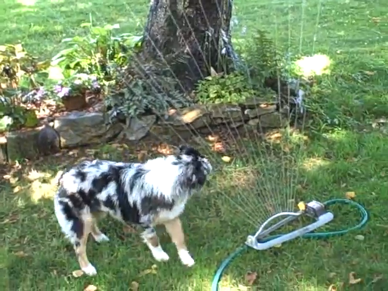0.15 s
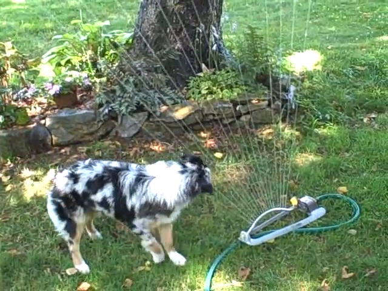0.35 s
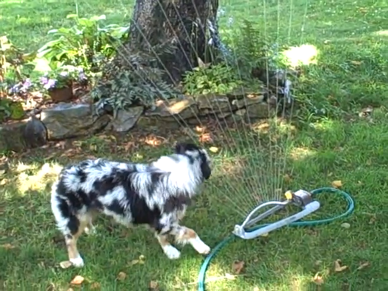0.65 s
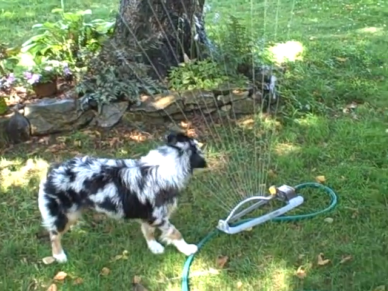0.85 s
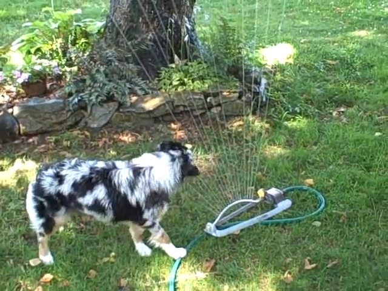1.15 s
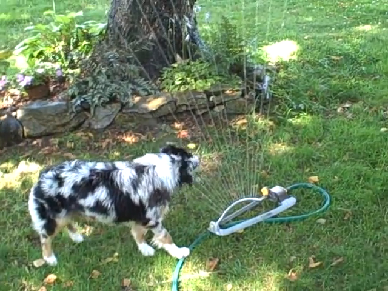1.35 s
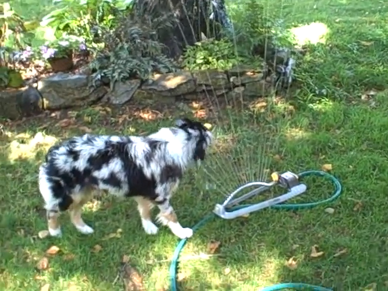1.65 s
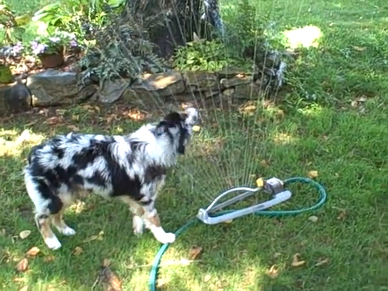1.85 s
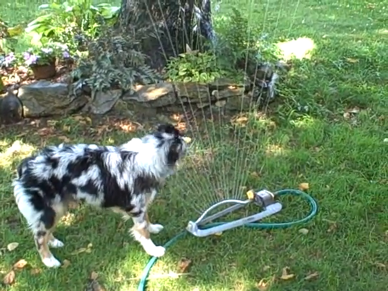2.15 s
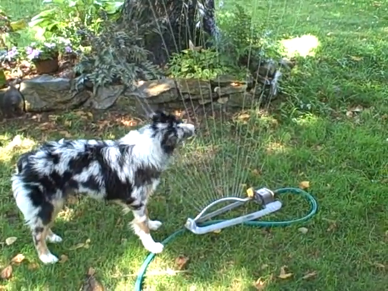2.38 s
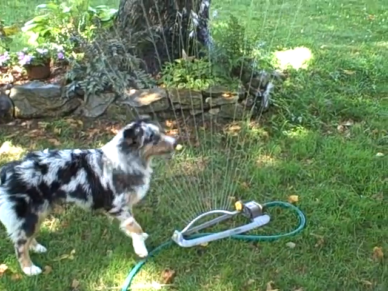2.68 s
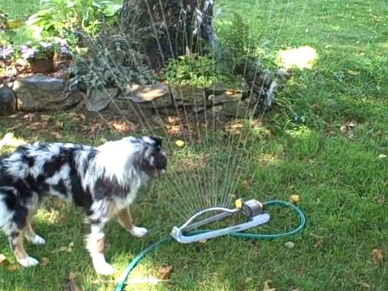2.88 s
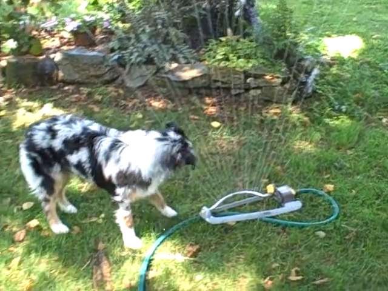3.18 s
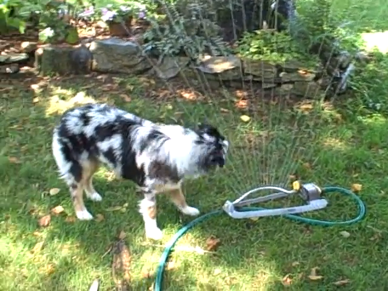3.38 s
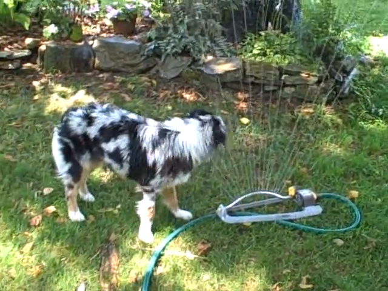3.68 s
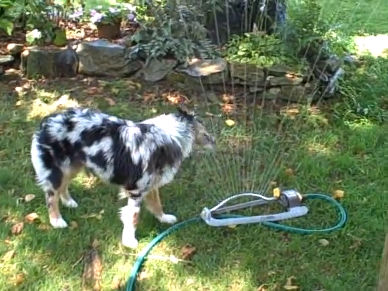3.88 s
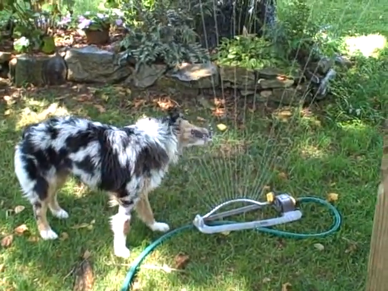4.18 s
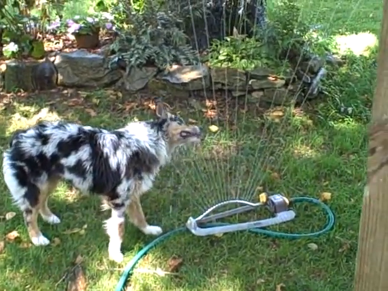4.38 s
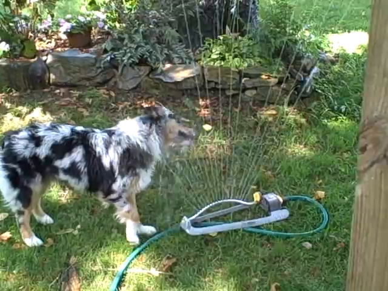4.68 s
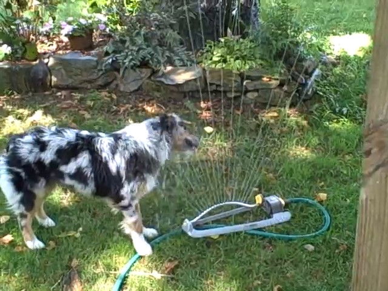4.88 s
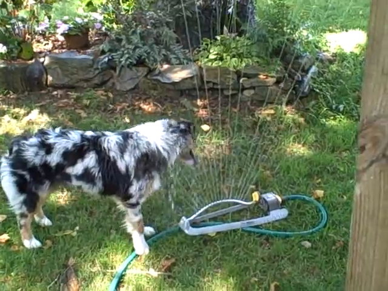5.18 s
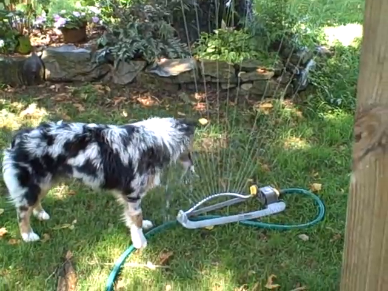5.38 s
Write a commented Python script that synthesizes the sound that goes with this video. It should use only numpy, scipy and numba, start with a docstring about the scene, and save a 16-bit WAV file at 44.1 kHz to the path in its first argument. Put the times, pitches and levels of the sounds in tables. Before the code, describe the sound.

Water sprays a dog outdoors in irregular bursts, crisp and hissy, over steady patter on grass and faint low rumble. Little mouth gulps and soft paw thuds come early; a lull holds a few dry ticks and a thin insect buzz. From about three and a half seconds the splashing builds, with squirts and bubbling, vowel-like water sounds in the open mouth. One microphone, no obvious echo.

```python
"""Dog snapping at a lawn sprinkler

Jets patter on a dog: random impacts over a mist of tiny ones, coloured as spatter and splash on its muzzle
and as hiss on its coat, ring in its open mouth through resonances that follow the jaw. Big drops snap as brief
sines, and small lip pockets squirt. A shrill buzz, probably an insect, is a click train ringing three resonances.
Paws thud and dry ticks crack in shaped noise, over patter on grass, a faint outdoor rumble and a drone."""
import sys
import numpy as np
from scipy import signal
from scipy.fft import rfft, irfft, next_fast_len
from scipy.io import wavfile
from scipy.ndimage import uniform_filter1d, map_coordinates
from numba import njit

SR = 44100
rng = np.random.default_rng(int(sys.argv[2]) if len(sys.argv) > 2 else 0)


def digitize_waveform(pressure):
    """Quantize a signal to 16-bit integers and store it at the path in sys.argv[1].

    Rows of a 2-D input are taken as channels; values are limited to [-1, 1].
    """
    field = np.atleast_2d(pressure).T
    bounded = np.clip(field, -1, 1)
    quanta = np.round(bounded * 32767).astype(np.int16)
    wavfile.write(sys.argv[1], SR, quanta)


N = 244314

# "Relative" levels are set before the layer's own trim.
# Dog's muzzle pushed into the jets:
# (start [s], length [s], relative spatter level [dB], relative splash level round the lips [dB])
SNAPS = [(0.01, 0.12, -51.5, -75), (0.612, 0.083, -40, -64), (0.728, 0.14, -43.5, -59),
         (0.926, 0.12, -48.5, -71), (1.187, 0.03, -39, -55), (1.295, 0.07, -39, -54.5),
         (1.439, 0.33, -38, -53), (1.712, 0.039, -42.5, -56), (2.146, .16, -41.5, -53.5),
         (2.24, .07, -43, -56), (2.362, 0.333, -49, -57), (3.52, 0.27, -42, -53.5),
         (3.652, 0.097, -41, -52), (3.902, .11, -39, -48.5), (4.07, 0.5, -41.5, -48),
         (4.17, 0.41, -36, -52.5), (4.596, 0.54, -38, -49.5), (4.68, 0.018, -33.5, -57),
         (4.898, 0.04, -39, -48), (5.024, .15, -41.5, -47), (5.225, 0.28, -41.5, -49)]
# Fan of jets sweeping over the coat: (start [s], length [s], relative level [dB])
COAT_SWEEPS = [(-.05, 0.4, -55.5), (.42, 0.25, -54), (.6, 0.59, -52), (1.16, .68, -55), (1.85, 0.82, -55.5),
               (2.68, 0.15, -56.5), (3.14, 0.37, -56.5), (3.5, 0.27, -51), (3.82, 0.49, -53.5),
               (4.2, 0.49, -46), (4.87, 0.097, -45), (5.01, 0.29, -40.5), (5.33, .25, -46.5)]
# Single gulps of water: (time of widest gape [s], half length [s], relative level [dB],
# cavity pitch at widest gape [Hz])
GULPS = [(.085, .013, -54.5, 1220), (0.626, 0.013, -59, 1320), (.66, .018, -54, 930),
         (.797, 0.023, -52.5, 896), (0.952, 0.033, -62.5, 940), (1.307, 0.0091, -50, 1625),
         (1.359, 0.029, -56, 1110), (1.487, .022, -53.5, 1030), (1.57, 0.025, -52.5, 920),
         (1.685, 0.019, -52.5, 1000), (1.77, 0.047, -54, 980), (2.199, 0.018, -56, 960),
         (2.26, 0.043, -58, 800), (2.475, 0.029, -59.5, 1020), (2.698, 0.017, -52, 1600),
         (3.756, 0.048, -59.5, 1200), (3.953, 0.027, -50.5, 1740), (4.26, 0.023, -43, 1276)]
# One long drink with the jaw working: (time [s], cavity pitch [Hz], relative level [dB])
DRINK = [(4.35, 1400, -58), (4.382, 1320, -45.5), (4.412, 1220, -50), (4.558, 1030, -42),
         (4.578, 1120, -44), (4.604, 1510, -47.5), (4.694, 1800, -45.5), (4.754, 1190, -56),
         (4.76, 1210, -44), (4.776, 1230, -47.5), (4.87, 1600, -50), (4.948, 1130, -42.5),
         (5.018, 1550, -54.5), (5.056, 1450, -46.5), (5.148, 1630, -50.5), (5.178, 1430, -52.5),
         (5.304, 1670, -46), (5.54, 1840, -60)]
# Wet squirts caught in a fold of the lips: (time of peak [s], level [dB], pitch [Hz])
SQUIRTS = [(.933, -50, 3930), (1.55, -53, 1960), (1.765, -45.5, 2700), (2.58, -51, 2410), (2.69, -49, 2550),
           (3.66, -45, 4480), (3.69, -40, 7400), (3.964, -48, 2430), (4.02, -41.5, 5040), (4.15, -43, 5200),
           (4.23, -40, 8000)]
# Single heavy drops: (time, just ahead of the snap [s], level [dB], pitch [Hz])
DROPS = [(0.4696, -30, 11800), (0.5148, -28, 10700), (0.593, -25, 13200), (0.8783, -20, 14000),
         (1.0319, -22, 14300), (1.2092, -24, 12200), (1.461, -20, 13400), (1.468, -21, 9250),
         (1.7386, -17.5, 10200), (2.066, -26, 11170), (2.2936, -21.5, 11700), (3.5667, -26, 11200),
         (3.7462, -17.5, 8500), (4.5228, -12, 13700), (4.5404, -19, 12300), (4.567, -18, 9150)]
# Swells of the insect's buzz:
# (start [s], length [s], relative level [dB], main resonance [Hz], mean click rate [1/s])
BUZZ = [(-.15, .48, -51.5, 7360, 90), (0.719, 0.37, -52.5, 5500, 168), (1.84, 0.42, -50, 5520, 168),
        (3.061, 0.444, -48.5, 5460, 185)]
# Paws on the turf: (time, just ahead of the thud's peak [s], relative level [dB])
PAWS = [(.085, -56.5), (.79, -55.5), (1.018, -60), (1.378, -57), (1.625, -60), (1.775, -57), (2.319, -58.5),
        (2.49, -61), (2.745, -67), (3.669, -60)]
# Dry ticks in the grass underfoot: (time [s], relative level [dB])
TICKS = [(0.456, -38), (2.903, -48), (2.916, -44), (2.953, -33.5), (2.976, -40)]
# Colour of fine bright spatter: (frequency [Hz], relative level [dB])
SPATTER = [(300, -32), (2000, -26), (3200, -11.5), (4200, -9), (6500, -4), (8500, -1), (10500, 1),
           (12500, 1.5), (14500, 0.5), (15800, 0.5)]
# Colour of the duller splash round the lips: (frequency [Hz], relative level [dB])
SPLASH = [(80, -11), (250, -11.5), (600, -10.5), (1200, -5), (1800, -1.5), (2300, 0), (3200, 0),
          (4500, 0.5), (7000, -1.5), (10000, 0.5), (15000, -32)]
# Colour of water striking fur: (frequency [Hz], relative level [dB])
FUR = [(500, -30), (2000, -11), (3100, -13), (4200, -2), (5400, -1), (6400, -2), (7700, -4), (9000, -13),
       (11000, -8), (15000, -29)]
# Colour of drops on grass: (frequency [Hz], relative level [dB])
GRASS = [(200, -5.5), (700, -3), (1500, -2), (2500, 4.5), (3800, 4.5), (6000, 0), (8000, 5), (10000, -27),
         (15000, -18.5)]
# Colour of the outdoor rumble: (frequency [Hz], relative level [dB])
RUMBLE = [(15, -16), (30, -1.5), (55, 1.5), (100, -3), (200, -4.5), (400, -7.5), (800, -10.5), (2000, -16),
          (8000, -41)]

# Rise [s], fall [s] and growth over the held length [dB] of each kind of swell
SNAP_ATTACK_S, SNAP_RELEASE_S, SNAP_PUSH_DB = 0.017, 0.059, 3  # grows as the muzzle goes deeper
COAT_ATTACK_S, COAT_RELEASE_S, COAT_GROWTH_DB = 0.035, 0.061, -0.5
BUZZ_ATTACK_S, BUZZ_RELEASE_S, BUZZ_GROWTH_DB = 0.18, 0.023, 3
STRAY_SPATTER_DB, STRAY_SPLASH_DB = -54.5, -65  # steady stray beads, relative levels
DRIP_DB, DRIP_S = -9.5, 0.18  # run-off from the muzzle: level under the snap, decay time
OPENING_BEND, CLOSING_BEND = 0.1, 0.028  # share the pitch is raised half a length from widest gape
OPENING_SLOWER = 1.24  # the jaw opens this many times more slowly than it shuts
DRINK_DB, DRINK_FADE_S = 0.5, 0.02  # trim of the long drink, fade-in time
UPPER_HZ, MIDDLE_GAPE_HZ = 2220, 1290  # upper and main mouth resonances at a middling gape
UPPER_FOLLOWS = 0.17  # exponent: how far the upper resonance follows the main pitch
BETWEEN_CLICKS = 0.15  # scratch left between clicks, as a share of the click's onset
TOP_HZ = 15780  # band limit of the whole scene


def muzzle():
    """Jets break on the muzzle in uneven spurts, as bright spatter and duller splash, then water runs off."""
    spatter = coloured(patchy(droplets(rate=5500, scatter_db=4, mist_db=-5), depth_db=2), SPATTER)
    splash = coloured(patchy(droplets(rate=3500, scatter_db=3, mist_db=-5), depth_db=2), SPLASH)
    start, length, spatter_db, splash_db = np.transpose(SNAPS)

    def flow(db, stray_db):
        """Direct hit, run-off and stray beads add in power."""
        hit = swells(zip(start, length, db), SNAP_ATTACK_S, SNAP_RELEASE_S, SNAP_PUSH_DB)
        run_off = swells(zip(start, length, db + DRIP_DB), SNAP_ATTACK_S, DRIP_S, SNAP_PUSH_DB)
        return np.sqrt(hit ** 2 + run_off ** 2 + amp(stray_db) ** 2)

    spatter *= amp(1.5) * flow(spatter_db, STRAY_SPATTER_DB) * spurting(rate=130, steady=2.8)
    splash *= amp(5) * flow(splash_db, STRAY_SPLASH_DB) * spurting(rate=90, steady=3.9)
    return spatter + splash


def coat():
    """On fur the jets hiss softly, fluttering as they break into beads, and a fine spray bounces off."""
    fur = coloured(patchy(droplets(rate=4000, scatter_db=6.5, mist_db=-3), depth_db=1.5), FUR)
    bounce = coloured(droplets(rate=2100, scatter_db=11, mist_db=-6), SPATTER)
    flutter = amp(0.98 * wobble(150))
    hiss = unit((fur + amp(-0.5) * bounce) * flutter)
    gain = swells(COAT_SWEEPS, COAT_ATTACK_S, COAT_RELEASE_S, COAT_GROWTH_DB)
    return amp(3.5) * gain * hiss


def mouth():
    """Drops drum in a cavity whose pitch follows the jaw; a weaker resonance above it moves less."""
    hz, gain = jaw()
    upper_hz = UPPER_HZ * (hz / MIDDLE_GAPE_HZ) ** UPPER_FOLLOWS
    hz = hz * (1 + 0.022 * wobble(70))  # sloshing water keeps changing the hollow
    drumming = droplets(rate=2200, scatter_db=1, mist_db=-1) * spurting(rate=100, steady=2.6)
    cavity = hollow(hollow(drumming, hz, width_hz=120), hz, width_hz=900)
    upper = hollow(hollow(drumming, upper_hz, width_hz=210), upper_hz, width_hz=650)
    return amp(-1) * gain * (cavity + amp(-6) * upper)


def jaw():
    """Pitch and gain of the mouth: each gulp sinks and rings loudest at the gape; the long drink wanders."""
    t = np.arange(N) / SR
    drink_hz, drink_db = curves(DRINK)
    drink_fade = np.clip((t - DRINK[0][0]) / DRINK_FADE_S + 0.5, 1e-6, 1)
    gains = [amp(drink_db + DRINK_DB) * drink_fade]
    pitches = [drink_hz]
    for s, half_length, db, hz in GULPS:
        stretch = np.where(t < s, OPENING_SLOWER, 1)
        u = (t - s) / (half_length * stretch)  # zero at the widest gape
        bend = np.where(u < 0, OPENING_BEND, CLOSING_BEND)
        gains.append(amp(db) * np.exp(-u ** 2 / 2))
        pitches.append(hz * (1 + bend * np.minimum(u ** 2, 4)))
    power = np.square(gains)
    # the loudest gesture dominates the pitch
    return np.average(pitches, axis=0, weights=power), np.sqrt(power.sum(axis=0))


def squirts():
    """A jet briefly rings a small pocket between lip and teeth."""
    out, t = np.zeros(N), np.arange(N) / SR
    beads = droplets(rate=7800, scatter_db=-20, mist_db=8)
    for s, db, hz in SQUIRTS:
        burst = np.exp(-((t - s) / 0.011) ** 2)
        pocket = hollow(hollow(beads, hz, width_hz=0.091 * hz), hz, width_hz=0.66 * hz)
        out += amp(db) * burst * pocket
    return out


def heavy_drops():
    """Each big drop snaps as a fast-decaying sine, then scatters a short bright spray."""
    out, t = np.zeros(N + SR), np.arange(SR // 25) / SR
    fizz = coloured(rng.standard_normal(N), [(1000, -38), (4000, -7), (9000, -3.5), (15000, -1.5)])
    for s, db, hz in DROPS:
        start = round((s + 0.0012) * SR)
        # each -60 * t / T term falls 60 dB in T seconds
        snap = np.sin(2 * np.pi * hz * t) * amp(-60 * t / 0.0032)
        spray_fade = 0.1 * amp(-60 * t / 0.0089) + amp(-16 - 60 * t / 0.066)
        spray = fizz[start:][:len(t)] * spray_fade
        out[start:][:len(t)] += amp(db) * (snap + spray)
    return out[:N]


def insect():
    """A fast train of scratchy clicks rings a shrill main resonance and two weaker ones."""
    events = [(s, length, db) for s, length, db, _, _ in BUZZ]
    gain = swells(events, BUZZ_ATTACK_S, BUZZ_RELEASE_S, BUZZ_GROWTH_DB)
    edges = [(edge, pitch, per_s) for s, length, _, pitch, per_s in BUZZ for edge in (s, s + length)]
    hz, rate = curves(edges)
    cycle = np.cumsum(rate * (1 + 0.077 * wobble(60)) / SR) % 1  # share of the click period gone by
    click_shape = np.exp(-np.pi * cycle) + BETWEEN_CLICKS
    clicks = click_shape * amp(wobble(120)) * rng.standard_normal(N)
    shrill = hollow(hollow(clicks, hz, width_hz=600), hz, width_hz=1000)
    low = hollow(hollow(clicks, 4130, width_hz=970), 3730, width_hz=1200)
    high = hollow(hollow(clicks, 7330, width_hz=590), 8300, width_hz=1300)
    return gain * unit(shrill + amp(-4) * low + amp(-3.5) * high)


def paws():
    """Feet shifting on turf give soft low thuds: dark noise under smooth bumps of weight."""
    t = np.arange(N) / SR
    weight = sum(amp(db) * np.exp(-((t - s - 0.015) / 0.012) ** 2) for s, db in PAWS)
    thud_colour = [(30, -34), (90, -1.5), (150, 0), (300, -7), (900, -47), (3000, -80)]
    return amp(2) * weight * coloured(rng.standard_normal(N), thud_colour)


def ticks():
    """Something dry clicks in the grass: a broad crack, then a faint rustle."""
    t = np.arange(N) / SR

    def fade(age):
        """A crack falling 60 dB in 10 ms and a weaker rustle taking 73 ms."""
        crack = amp(-60 * np.abs(age) / 0.01)
        rustle = amp(-28 - 60 * np.abs(age) / 0.073)
        return (age >= 0) * (crack + rustle)

    force = sum(amp(db) * fade(t - s) for s, db in TICKS)
    dry_colour = [(300, -14.5), (1200, -9), (2200, -7), (4000, 4), (8000, 3), (15000, -17)]
    return amp(-5) * force * coloured(rng.standard_normal(N), dry_colour)


def garden():
    """Far drops fall steadily on grass, over a low rumble and a faint distant drone near 58 Hz."""
    grass = coloured(droplets(rate=1800, scatter_db=2.5, mist_db=-1.5), GRASS)
    patter = grass * amp(-57.5 + 0.35 * wobble(7.6))
    rumble = amp(-62.5) * coloured(rng.standard_normal(N), RUMBLE)
    hum = filtered(rng.standard_normal(N), lambda hz: np.exp(-((hz - 58) / 5) ** 2))
    drone = amp(-71.5) * unit(hum)
    return patter + rumble + drone


def droplets(rate, scatter_db, mist_db):
    """Impacts of random size at random moments (rate a second) merge into a mist of countless tiny ones."""
    hits = rng.random(N) < rate / SR
    sizes = amp(scatter_db * np.minimum(rng.standard_normal(N), 2.5))
    impacts = unit(hits * sizes * rng.choice([-1, 1], N))
    return unit(impacts + amp(mist_db) * rng.standard_normal(N))


def spurting(rate, steady):
    """Flow gain that swells at once with each slug of water and drains away."""
    slugs = (rng.random(N) < rate / SR) * rng.uniform(0.41, 1, N)

    def drain(hz):
        """A 6.2 ms decay with the slow drift below 14 Hz taken out."""
        return 1j * hz / (1j * hz + 14) / (1 + 2j * np.pi * hz * 0.0062)

    flow = np.maximum(steady + unit(filtered(slugs, drain)), 0.1)
    return unit(np.sqrt(flow) * amp(0.62 * wobble(350)))


def patchy(x, depth_db):
    """The colour drifts as water finds new spots to strike: broad slow patches and narrow brief ones."""
    z = signal.stft(x, nperseg=512)[2]

    def field(bins, frames):
        """Random patches smoothed over frequency bins and time frames."""
        across_bins = uniform_filter1d(rng.standard_normal(z.shape), bins, axis=0)
        return unit(uniform_filter1d(across_bins, frames, axis=1))

    gain_db = depth_db * (0.7 * field(bins=14, frames=16) + 0.89 * field(bins=3, frames=7))
    return unit(signal.istft(z * amp(gain_db), nperseg=512)[1][:N])


@njit
def resonate(x, angle, radius):
    """A two-pole resonance whose pitch (angle per sample) may change from sample to sample."""
    out = np.zeros(len(x))
    for i in range(2, len(x)):
        feedback = (1 + radius ** 2) * np.cos(angle[i]) * out[i - 1] - radius ** 2 * out[i - 2]
        out[i] = x[i] - x[i - 2] + feedback
    return out


def hollow(x, hz, width_hz):
    """x ringing in a cavity of fixed or moving pitch, at rms 1; a wider band rings shorter."""
    angle = 2 * np.pi * hz / SR * np.ones(N)
    return unit(resonate(x, angle, np.exp(-np.pi * width_hz / SR)))


def swells(rows, attack_s, release_s, growth_db):
    """Gain of (start [s], length [s], level [dB]) events that rise, grow and die away; their powers add."""
    t, power = np.arange(N) / SR, np.zeros(N)
    for start, length, db in rows:
        rise = np.clip((t - start) / attack_s, 0, 1)
        hold_db = db + growth_db * (np.clip((t - start) / length, 0, 1) - 0.5)
        fall = np.exp(-np.maximum(t - start - length, 0) / release_s)
        power += (rise * amp(hold_db) * fall) ** 2
    return np.sqrt(power)


def curves(rows):
    """One value per sample for each column after the time."""
    s, *cols = np.transpose(rows)
    return [np.interp(np.arange(N) / SR, s, c) for c in cols]


def wobble(rate):
    """A smooth random curve, rate knots a second."""
    knots = rng.standard_normal(int(N * rate / SR) + 4)
    return map_coordinates(knots, [np.arange(N) * rate / SR])


def coloured(x, spectrum):
    """x shaped by (frequency [Hz], level [dB]) points, at rms 1."""
    f, db = np.transpose(spectrum)
    return unit(filtered(x, lambda hz: amp(np.interp(np.log(hz + 1), np.log(f), db))))


def filtered(x, response):
    """The spectrum of x multiplied by a response of frequency."""
    m = next_fast_len(N + 8192)
    return irfft(rfft(x, m) * response(np.fft.rfftfreq(m, 1 / SR)), m)[:N]


def amp(db):
    """Decibels to amplitude."""
    return 10 ** (np.asarray(db) / 20)


def unit(x):
    """x scaled to rms 1."""
    return x / np.sqrt(np.mean(x ** 2) + 1e-20)


def scene():
    """Water on the dog, then the insect, the paws, the ticks and the garden, summed to one channel."""
    water = muzzle() + coat() + mouth() + squirts() + heavy_drops()
    return (water + insect() + paws() + ticks() + garden())[None]


def record(dry):
    """A steep low-pass: nothing is kept at or above the band limit."""
    return filtered(dry[0], lambda hz: hz < TOP_HZ)[None]


dry = scene()
out = record(dry)
digitize_waveform(out)
```